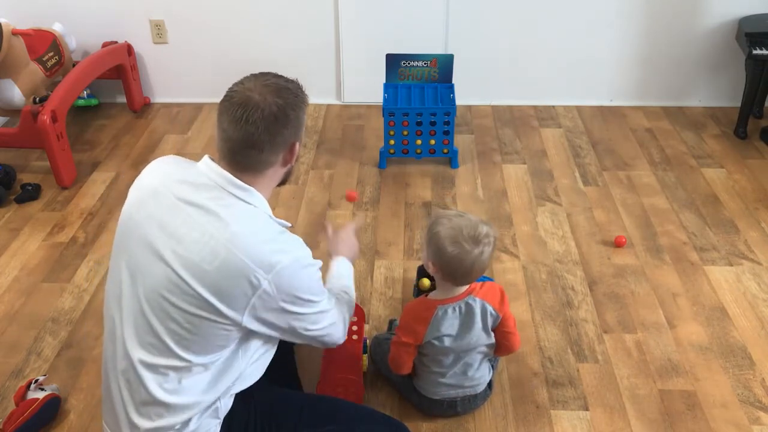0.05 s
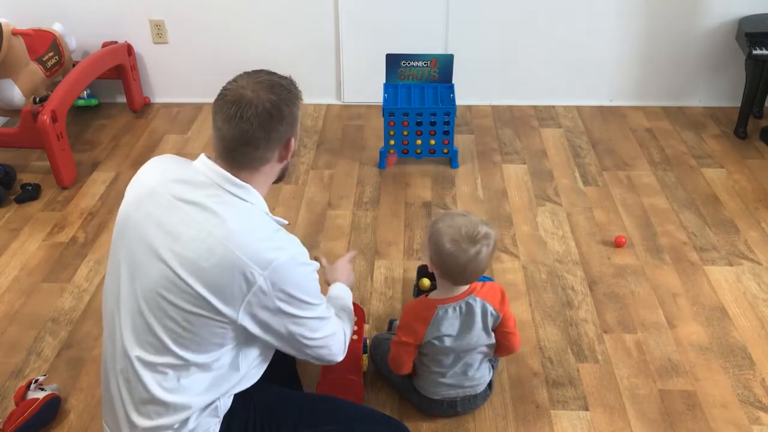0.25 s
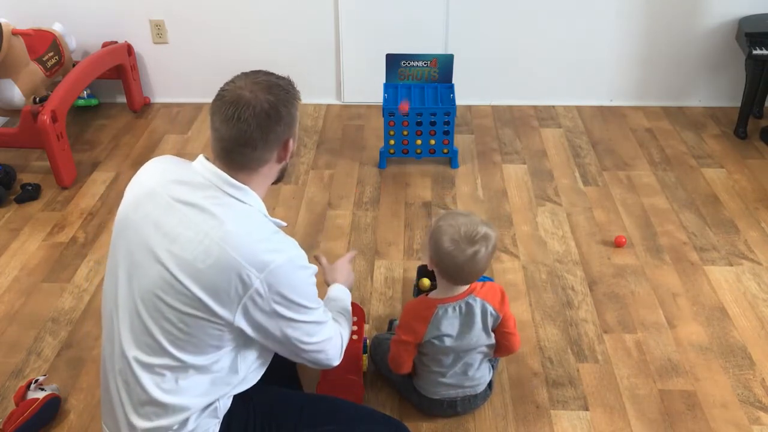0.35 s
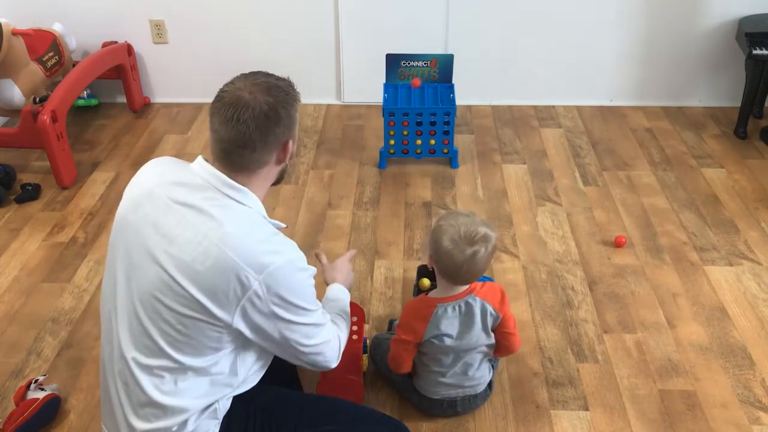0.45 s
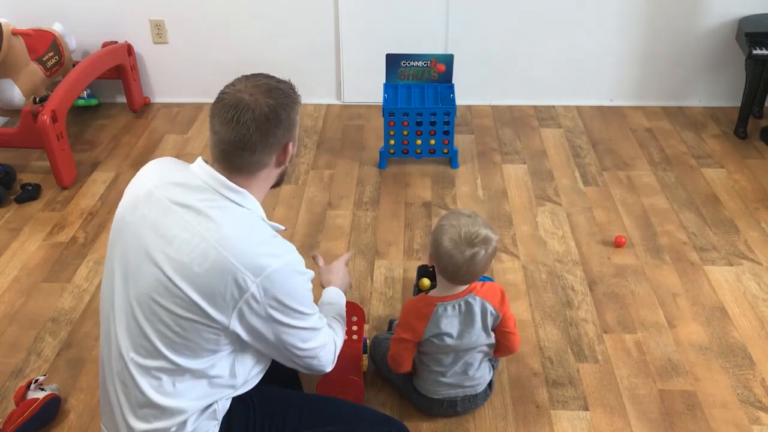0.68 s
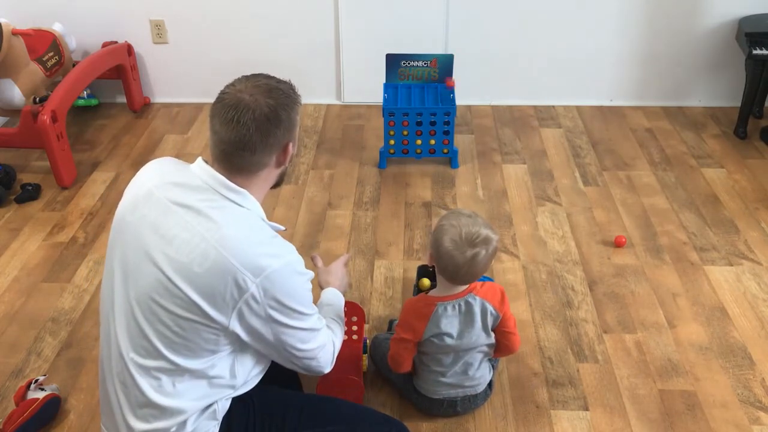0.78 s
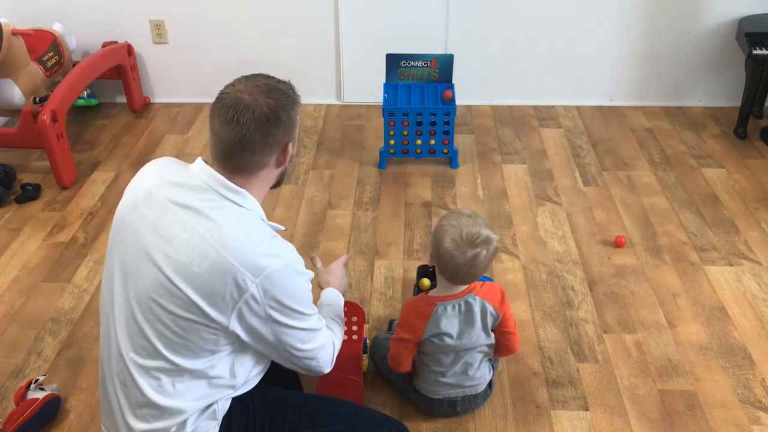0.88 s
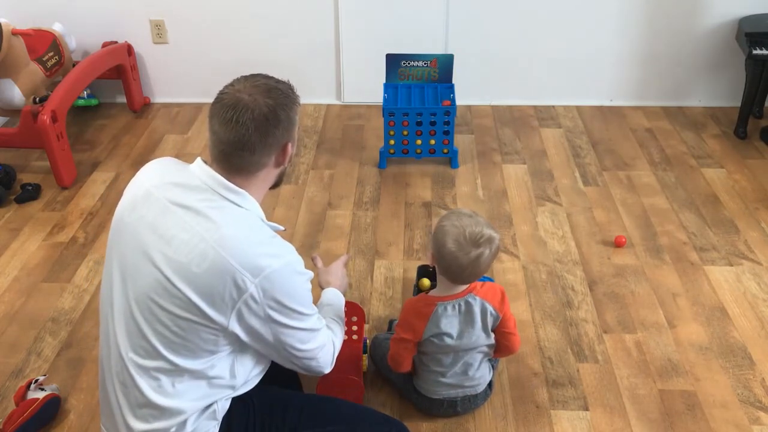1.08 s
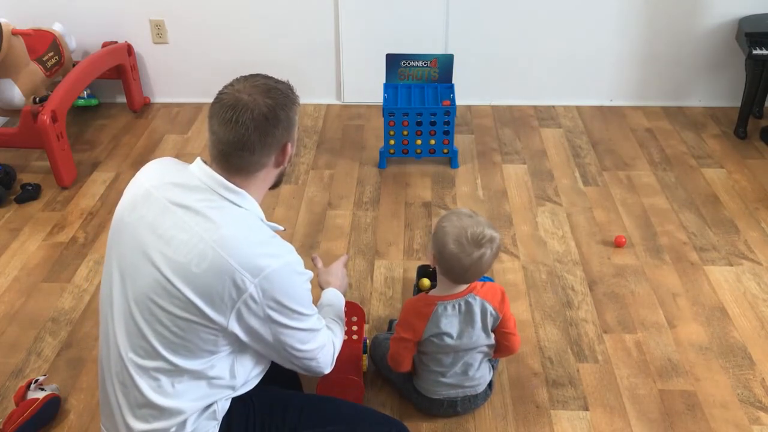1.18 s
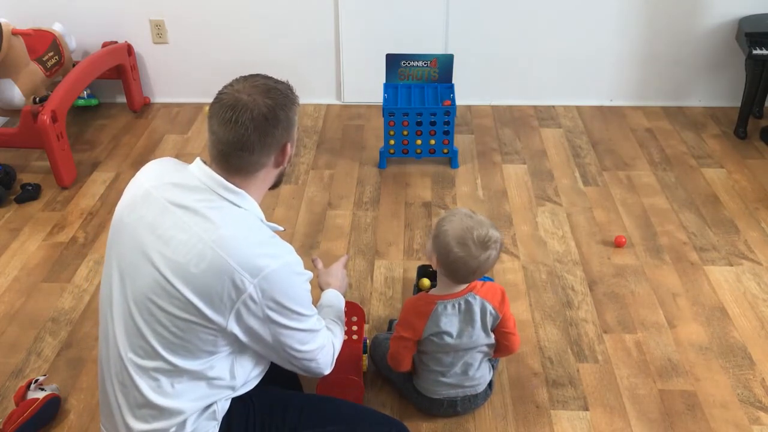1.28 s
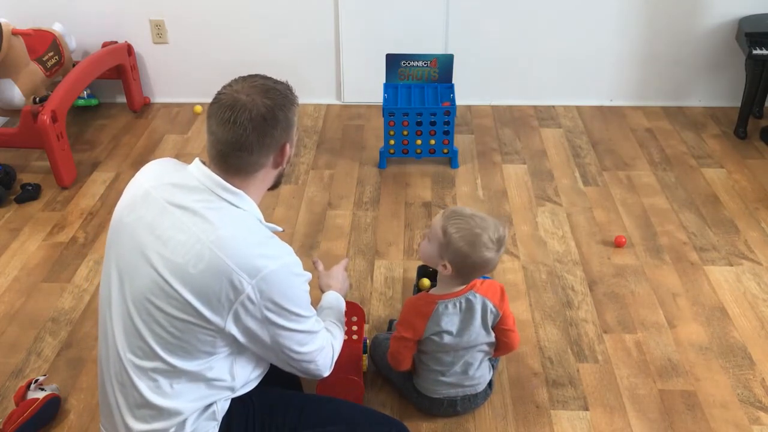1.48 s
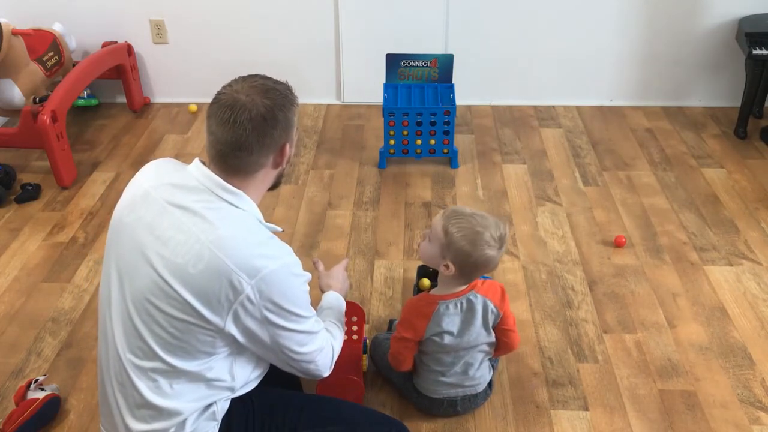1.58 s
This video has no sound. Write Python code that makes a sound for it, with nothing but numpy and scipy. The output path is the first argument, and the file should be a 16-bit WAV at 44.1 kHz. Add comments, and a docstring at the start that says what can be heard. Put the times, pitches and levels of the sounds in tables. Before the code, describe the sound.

Hollow plastic balls bounce on a hard floor and knock a plastic grid, echoing.

```python
"""A bare, echoing room with a wood-look floor, where two hollow plastic balls bounce.
One settles, its bounces coming ever faster. The other is thrown: it cracks off the floor,
knocks the backboard of a plastic game grid and, just after a dry click, rattles down into a slot.
Each impact is a short force pulse that excites the damped modes of the shell and the struck surface.
The room reverberates the clicks and the shells' ring, over a faint steady hush."""
import sys
import numpy as np
from scipy import signal
from scipy.fft import rfft, irfft, next_fast_len
from scipy.io import wavfile

SR = 44100
rng = np.random.default_rng(int(sys.argv[2]) if len(sys.argv) > 2 else 0)


def int16_out(signal):
    """Quantize to a 16-bit WAV file."""
    q = np.round(np.clip(np.atleast_2d(signal).T, -1, 1) * 32767)
    wavfile.write(sys.argv[1], SR, q.astype(np.int16))


N = 72765


def amp(db):
    """Decibels express an amplitude ratio on a logarithmic scale."""
    return 10 ** (np.asarray(db) / 20)


def curve_at(points, hz):
    """Interpolation of (Hz, value) points on a logarithmic frequency axis."""
    point_hz, values = np.transpose(points)
    return np.interp(np.log(hz + 1), np.log(point_hz + 1), values)


def unit_energy(x):
    """Normalisation: the squared samples sum to 1."""
    return x / np.linalg.norm(x)


def add(track, start_s, sound):
    """Superposition: a sound adds to the track, and may begin before time zero."""
    i = round(start_s * SR)
    part = sound[max(-i, 0):N - i]
    track[max(i, 0):][:len(part)] += part


def decay(t, t60):
    """Exponential damping: the level falls 60 dB in t60 seconds."""
    return np.exp(-np.log(1000) * t / t60)


def swell(sound, rise_s):
    """Inertia: a large surface takes time to start moving. The result has unit energy."""
    t = np.arange(len(sound)) / SR
    return unit_energy(sound * (1 - np.exp(-t / rise_s)) ** 2)


def coloured_noise(spectrum, size):
    """Spectral shaping: white noise takes on the given envelope."""
    gain = amp(curve_at(spectrum, np.fft.rfftfreq(size, 1 / SR)))
    return irfft(rfft(rng.standard_normal(size)) * gain, size)


# Spectrum of the room's air. Each row: frequency in Hz, relative level in dB.
AIR_SPECTRUM = [(25, -15), (55, 18.5), (120, 19), (220, 7), (1000, -11), (8000, -7), (16000, -15)]
def room_tone(rms_db=-64.5):
    """Ambient noise: faint steady air, strongest in the bass."""
    return amp(rms_db) * np.sqrt(N) * unit_energy(coloured_noise(AIR_SPECTRUM, N))


# Reverberation time of the room. Each row: frequency in Hz, T60 in seconds.
REVERB_TIMES = [(100, 0.24), (400, 0.67), (1000, .57), (2800, 0.47), (7500, 0.38), (15000, 0.22)]
# Early reflections from the near walls. Each row: delay in seconds, relative gain.
WALL_REFLECTIONS = [(.002, 0.46), (.0052, 0.8), (.013, 0.35)]
def room(sound, direct, size=32768):
    """Reverberation: convolution with the direct path, wall echoes, early scatter and a diffuse tail."""
    t = np.arange(size) / SR
    hz, frame_s, spectra = signal.stft(rng.standard_normal(size), SR, nperseg=256)
    spectra = spectra * decay(frame_s, curve_at(REVERB_TIMES, hz)[:, None])
    tail = signal.istft(spectra, SR, nperseg=256)[1][:size]
    scatter = rng.standard_normal(size) * decay(t, t60=0.078)
    tail_rise_s, wall_smear_s = 0.0085, 0.0024
    response = 0.87 * unit_energy(tail * (1 - np.exp(-t / tail_rise_s))) + 0.5 * unit_energy(scatter)
    response[0] += direct
    for delay_s, gain in WALL_REFLECTIONS:
        smear = (t >= delay_s) * np.exp(-np.abs(t - delay_s) / wall_smear_s)
        response += gain * unit_energy(rng.standard_normal(size) * smear)
    return signal.fftconvolve(sound, unit_energy(response))


def contact_pulse(spectrum, lift_db=0, contact_ms=0, release=0, size=32768):
    """Interference: the press and its weaker release, contact_ms apart, notch the treble."""
    hz = np.fft.rfftfreq(size, 1 / SR)
    lift_ramp = curve_at([(1270, 0), (5330, 1)], hz)
    notch_ramp = curve_at([(1380, 0), (3000, 1)], hz)
    comb = np.abs(1 + release * notch_ramp * np.exp(-2j * np.pi * hz * contact_ms / 1000))
    magnitude = amp(curve_at(spectrum, hz) + lift_db * lift_ramp) * comb
    # Folding the cepstrum gives a causal, minimum-phase pulse.
    cepstrum = irfft(np.log(magnitude))
    cepstrum[1:size // 2] *= 2
    cepstrum[size // 2 + 1:] = 0
    return unit_energy(irfft(np.exp(rfft(cepstrum))))


def ring(modes, db_per_octave=0, detune=0.0029, size=32768):
    """Free vibration: a sum of damped modes, whose levels and pitches vary a little at each strike."""
    t = np.arange(size) / SR
    out = np.zeros(size)
    for hz, db, t60 in modes:
        gain = amp(db + db_per_octave * np.log2(hz / modes[0][0]) + rng.normal(0, 1))
        struck_hz = hz * (1 + detune * rng.standard_normal())
        out += gain * decay(t, t60) * np.sin(2 * np.pi * struck_hz * t)
    return unit_energy(out)


# Modes of the floor. Each row: frequency in Hz, relative level in dB, T60 in seconds.
FLOOR_MODES = [(120.8, -6.5, 0.28), (193.3, 5.5, 0.33), (383, -3, 0.27), (571, -3.5, 0.25),
               (701, 10.5, 0.24), (854, 8, 0.22), (1085, -1, 0.3)]
# The room's bass after a thump. Each row: frequency in Hz, relative level in dB.
RUMBLE_SPECTRUM = [(25, -31), (57, 7), (120, 5), (200, -3), (400, -42), (1000, -70)]
def floor_thump(ring_db, db_per_octave=0, rise_s=0.0061, size=32768):
    """Impact excitation: the floor booms with a sinking pitch and rings, and the room rumbles on."""
    t = np.arange(size) / SR
    rest_hz, drop_hz, drop_s = 181, 73.6, 0.018
    boom_hz = rest_hz + drop_hz * np.exp(-t / drop_s)
    boom = np.sin(2 * np.pi * np.cumsum(boom_hz) / SR) * decay(t, t60=0.21)
    rumble = coloured_noise(RUMBLE_SPECTRUM, size) * decay(t, t60=0.98)
    ringing = ring(FLOOR_MODES, db_per_octave)
    return swell(boom, rise_s) + amp(ring_db) * swell(ringing, rise_s) + amp(-16) * swell(rumble, rise_s)


# Modes of a ball's shell. Each row: frequency in Hz, relative level in dB, T60 in seconds.
SHELL_MODES = [(7752, -6, 0.039), (7733, -7, 0.047), (9610, 2.5, 0.022), (9540, 0.5, 0.023),
               (11080, -1.5, 0.023), (11900, -0.5, 0.03), (12760, -11, .016)]
def shell_ring(db, gentle=False):
    """Shell resonance: a hollow ball rings high, and gentle contacts excite mostly its lowest modes."""
    return amp(db) * ring(SHELL_MODES, db_per_octave=-35.5 if gentle else 0)


# Spectrum of the click and the rattle. Each row: frequency in Hz, relative level in dB.
CLICK_SPECTRUM = [(60, -23), (300, -7), (500, -11.5), (850, -1), (1500, 2), (2500, -2), (4000, -8.5),
                  (6300, -19), (12000, -15.5), (16000, -33)]
# Modes of the grid's frame. Each row: frequency in Hz, relative level in dB, T60 in seconds.
FRAME_MODES = [(311.5, 0.5, 0.11), (811, 6, 0.13), (1306, 7, 0.072), (1799, -5.5, 0.37), (2225, -11, 0.84),
               (2315, -9, 0.23), (2515, -5, 0.34)]
# First a short, dry, bright click that stops abruptly, then the rattle. Each row: start in seconds,
# click level in dB, treble lift in dB, shell level in dB, direct gain, frame level in dB.
CLICKS = [(.8335, -3, 4, 2, 1.6, -27), (0.8923, 4, -7, -3, .2, 2.5), (.903, 1.5, -12, -12.5, 0.33, -0.5),
          (1.0, 3.5, 3, -11, 0.3, -9), (1.097, -3.5, 5, -23, 0.3, -8), (1.646, -4.5, 8, -26, 0.15, -15)]
PLASTIC_RISE_S = 0.0023
def click_and_rattle():
    """Transients: a dry click sounds, then the ball's collisions in the slot ring the grid's frame."""
    out = np.zeros(N)
    for start_s, click_db, lift_db, shell_db, direct, frame_db in CLICKS:
        click = amp(click_db) * contact_pulse(CLICK_SPECTRUM, lift_db)
        add(out, start_s, room(click + shell_ring(shell_db, gentle=True), direct))
        add(out, start_s, amp(frame_db) * swell(ring(FRAME_MODES), PLASTIC_RISE_S))
    return out


# Spectrum of a light bounce. Each row: frequency in Hz, relative level in dB.
BOUNCE_SPECTRUM = [(60, -18.5), (300, -3), (530, -6.5), (780, 2.5), (1150, 3), (2000, -3.5), (3300, -10),
                   (3800, -6), (4400, -10), (6200, -21), (9000, -12.5), (12300, -11), (13800, -18),
                   (16000, -17)]
# Bounces, each on a different spot of the shell. Each row: start in seconds, click level in dB,
# treble lift in dB, contact time in ms, shell level in dB, thump level in dB.
SETTLING_BOUNCES = [(-.05, 4.5, -2, 0.54, -9, -14.5), (.2, 9, -0.5, 0.42, -5.5, -7.5),
                    (0.4442, 5.5, -1, 0.55, -8, -14), (0.654, 8.5, -6, 0.46, -15, -12.5),
                    (0.8291, 2.5, 2, 0.37, 0, -8.5), (0.984, -2, -1.5, 0.69, -13, -8),
                    (1.124, 4.5, 2, 0.39, 1, -9), (1.241, -1.5, -1, 0.58, -35, -10),
                    (1.344, -4, -1, 0.65, -21, -12.5), (1.435, -0.5, 1.5, 0.43, -21.5, -14.5),
                    (1.511, -2.5, 0, 0.45, -12.5, -19.5), (1.575, -6, 0.5, 0.59, -30, -16),
                    (1.632, -9.5, -22, 0.4, -20, -6.5)]
def settling_ball():
    """Inelastic rebound: each bounce loses energy, so the next flight is shorter."""
    out = np.zeros(N)
    for start_s, click_db, lift_db, contact_ms, shell_db, thump_db in SETTLING_BOUNCES:
        click = amp(click_db) * contact_pulse(BOUNCE_SPECTRUM, lift_db, contact_ms, release=0.8)
        add(out, start_s, room(click + shell_ring(shell_db, gentle=True), direct=0.06))
        # Light bounces barely reach the floor's upper modes.
        add(out, start_s, amp(thump_db) * floor_thump(ring_db=-3.5, db_per_octave=-4))
    return out


# Spectrum of the hard bounce. Each row: frequency in Hz, relative level in dB.
CRACK_SPECTRUM = [(60, -26), (300, -1.5), (480, -7), (700, 3), (1200, 5), (2000, 1), (2900, -6),
                  (3600, -0.5), (4900, -12), (6100, -13), (9000, -13), (12000, -16), (16000, -26)]
# The thrown ball's landing. One row: start in seconds, crack level in dB, contact time in ms,
# shell level in dB, thump level in dB.
LANDING = (.254, 13.8, 0.4115, 14.1, 0.55)
def thrown_ball():
    """Impulsive excitation: one hard bounce drives the full range of shell and floor modes."""
    out = np.zeros(N)
    start_s, crack_db, contact_ms, shell_db, thump_db = LANDING
    crack = amp(crack_db) * contact_pulse(CRACK_SPECTRUM, contact_ms=contact_ms, release=0.8)
    add(out, start_s, room(crack, direct=0.29) + room(shell_ring(shell_db), direct=1))
    add(out, start_s, amp(thump_db) * floor_thump(ring_db=3.5))
    return out


# Spectrum of a knock on the backboard. Each row: frequency in Hz, relative level in dB.
KNOCK_SPECTRUM = [(60, -22), (160, -39), (260, -7), (400, -15.5), (520, -2), (850, 2), (1500, 2),
                  (2000, -8.5), (2700, -5), (3500, -21), (6500, -22), (11500, -24), (16000, -41)]
# Modes of the backboard. Each row: frequency in Hz, relative level in dB, T60 in seconds.
BOARD_MODES = [(237.3, 0.5, 0.43), (630, -8, 0.25), (794, -6, 1), (858, 2, 0.55), (919, 1, 0.54),
               (1010, 15, 0.077), (1135, 8.5, 0.2), (1831, 5, .12), (1505, 12.5, 0.081)]
# The strike and its slap back. Each row: start in seconds, knock level in dB, contact time in ms,
# shell level in dB, board level in dB.
BOARD_KNOCKS = [(0.6459, 13, 0.55, 3, 10.5), (.656, 7.5, 0.62, -14, 4.5)]
def backboard_knock():
    """Plate resonance: struck by the thrown ball, the board rings hollow and slaps back in its mount."""
    out = np.zeros(N)
    for start_s, knock_db, contact_ms, shell_db, board_db in BOARD_KNOCKS:
        knock = amp(knock_db) * contact_pulse(KNOCK_SPECTRUM, contact_ms=contact_ms, release=0.59)
        add(out, start_s, room(knock + shell_ring(shell_db), direct=0.91))
        add(out, start_s, amp(board_db) * swell(ring(BOARD_MODES), PLASTIC_RISE_S))
    return out


def scene():
    """Superposition: all the sources sum in mono."""
    return (settling_ball() + thrown_ball() + backboard_knock() + click_and_rattle() + room_tone())[None]


def record(dry):
    """Clipping and band limiting: peaks stop at full scale, then a steep low-pass cuts the top."""
    size = next_fast_len(N + SR // 2)
    cutoff_hz = 15800
    low_pass = 1 / np.sqrt(1 + (np.fft.rfftfreq(size, 1 / SR) / cutoff_hz) ** 160)
    return irfft(rfft(np.clip(dry, -1, 1), size) * low_pass, size)[..., :N]


dry = scene()
out = record(dry)
int16_out(out)
```